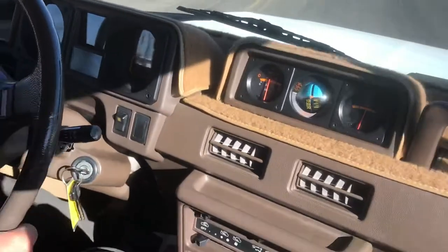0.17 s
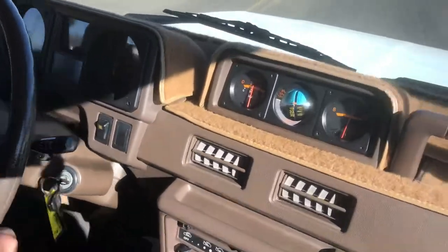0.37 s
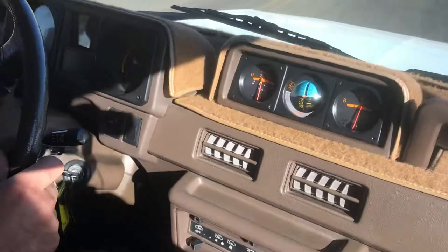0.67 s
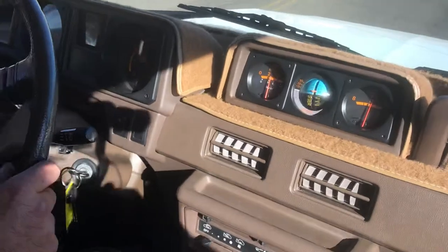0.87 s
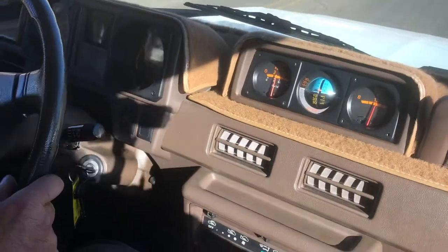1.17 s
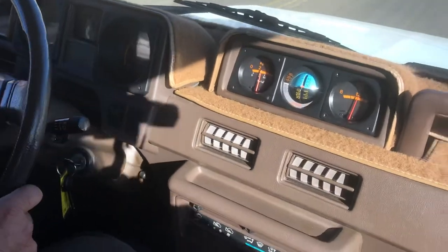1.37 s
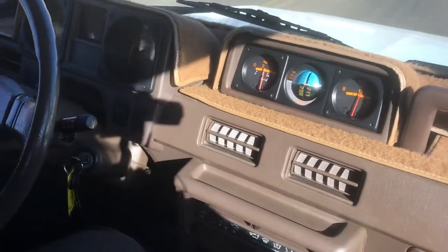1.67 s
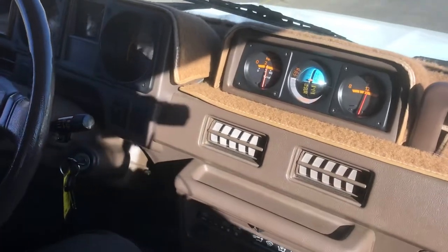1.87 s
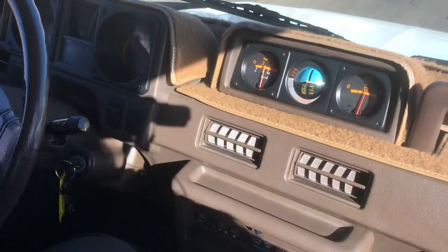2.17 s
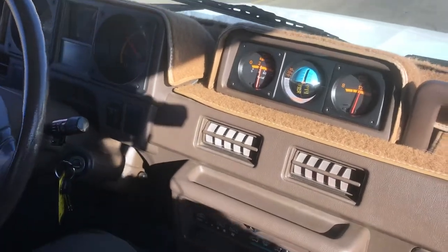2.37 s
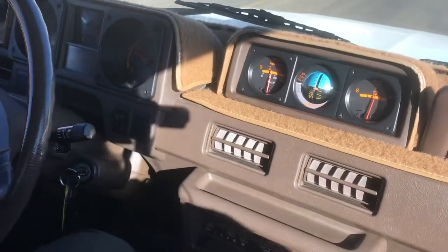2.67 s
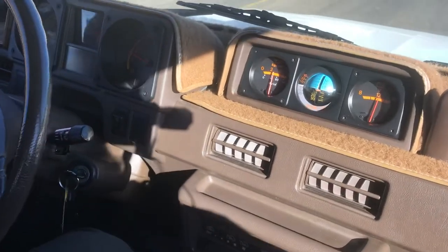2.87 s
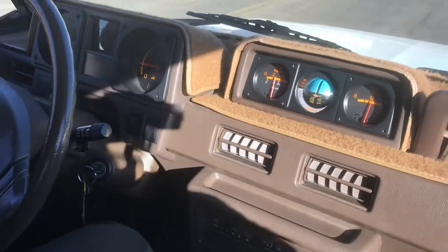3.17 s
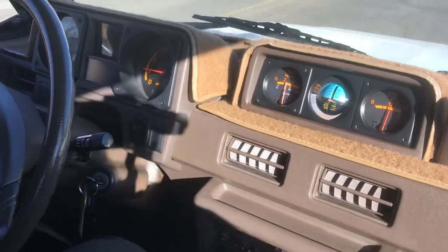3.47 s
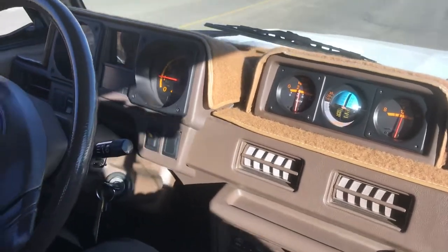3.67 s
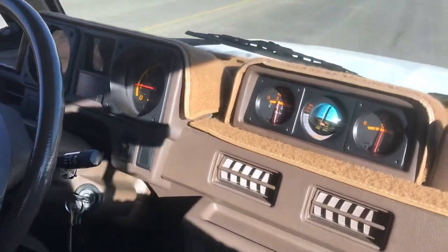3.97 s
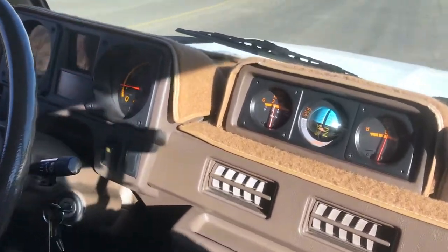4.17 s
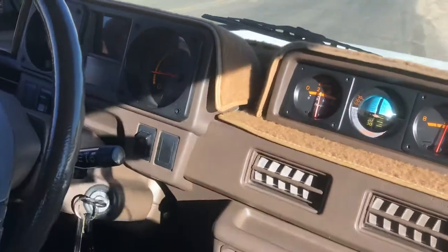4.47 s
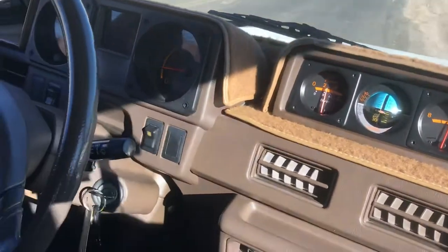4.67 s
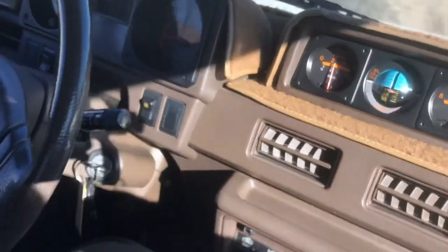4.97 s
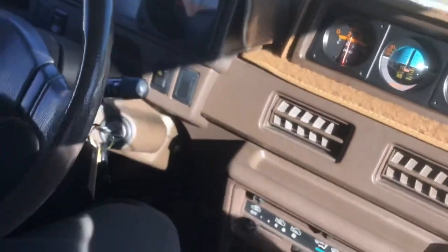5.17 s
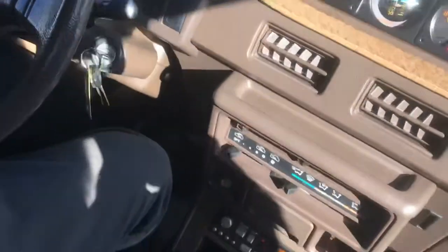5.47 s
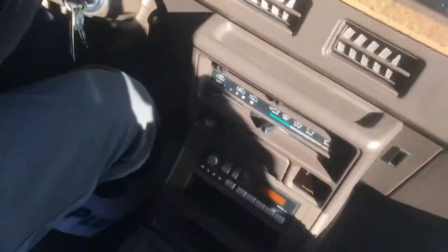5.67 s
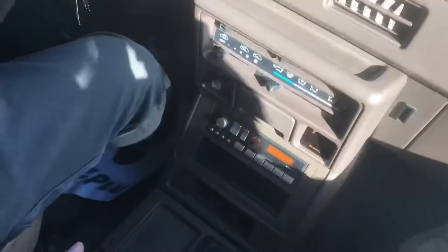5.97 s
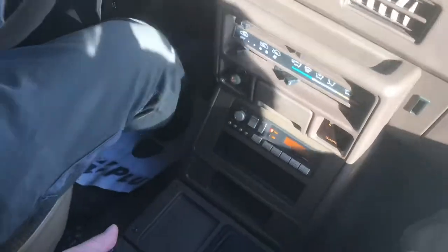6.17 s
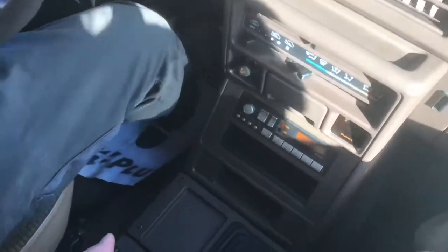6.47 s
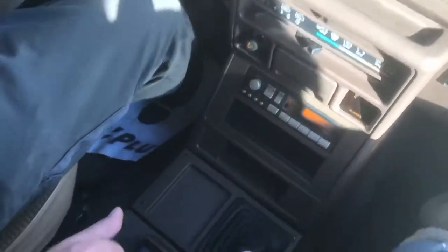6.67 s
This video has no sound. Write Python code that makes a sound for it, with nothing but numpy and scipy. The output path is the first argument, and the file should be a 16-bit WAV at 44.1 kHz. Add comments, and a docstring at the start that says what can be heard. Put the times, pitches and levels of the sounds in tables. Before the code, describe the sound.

Low cabin boom and road roar as the engine stops pulling, bumps thump and rattle the dashboard, keys tick faintly, engine hum returns quieter.

```python
"""A booming cabin and a gently pulling engine with a rising whine, inside an old four-wheel drive on a rough road.
The engine, sine tones tied to its firing rate, eases off and later returns more quietly while its whine dies away.
Shaken resonances of air, panels and tyres boom, drone and hum beneath tyre roar and air hiss made of coloured noise.
Bumps swell the road and rattle loose trim in flurries of tiny contacts; dashboard plastic clicks in sharp snaps.
Keys tick and briefly ring at the ignition, and a hand and sleeve rub softly at the wheel as grainy noise."""
import sys
import numpy as np
from scipy import signal
from scipy.fft import rfft, irfft, next_fast_len
from scipy.io import wavfile
from scipy.ndimage import uniform_filter1d, map_coordinates

SR = 44100
rng = np.random.default_rng(int(sys.argv[2]) if len(sys.argv) > 2 else 0)


def generate_wav(signal):
    """Clip the signal to [-1, 1] and save it as 16-bit WAV at the path in sys.argv[1]."""
    frames = np.transpose(np.atleast_2d(signal))
    scaled = np.clip(frames, -1, 1) * 32767
    pcm = np.round(scaled).astype(np.int16)
    wavfile.write(sys.argv[1], SR, pcm)


N = 300762

# Engine speed: (time [s], firing rate [Hz])
FIRING_RATE = [(0, 66.9), (.2, 67.3), (.4, 68.3), (.8, 69.3), (1.2, 70.1), (1.6, 71.2), (2.3, 72.3),
               (2.8, 71), (3.5, 68), (5, 66), (6.82, 64)]
# Engine load, the gain of the hum: (time [s], level [dB])
ENGINE_LOAD = [(0, -1), (.5, 2.5), (1.1, -1.5), (1.5, -1.5), (1.9, -39), (2.5, -34), (4.4, -33),
               (5.1, -9.5), (6.82, -11)]
# Engine hum at 0 dB load: (multiple of the firing rate, mean level [dB])
HUM_ORDERS = [(1, -25), (1.5, -33.5), (2, -33.5), (2.5, -49), (3, -46.5), (3.25, -49), (4.25, -58.5),
              (5.5, -62)]
# Gain of the belt whine: (time [s], level [dB])
BELT_LEVEL = [(0, -1), (.45, 1), (.75, -2), (.95, -9.5), (1.35, -1), (1.6, -2), (1.8, -17), (2.2, -6),
              (2.5, -14), (6.82, -51)]
# Whine of the belt-driven parts at 0 dB gain: (multiple of the firing rate, mean level [dB])
WHINE_ORDERS = [(14, -66), (17, -51), (18, -61), (37, -74)]


def engine():
    """Firing orders and belt whine follow the shaft speed, each with its own fluttering level and drifting phase."""
    rate_hz, = curves(FIRING_RATE)
    load_db, = curves(ENGINE_LOAD)
    belt_db, = curves(BELT_LEVEL)
    phase = 2 * np.pi * np.cumsum(rate_hz) / SR

    def tones(orders, flutter_db, drift_rad, knots_per_s):
        total = np.zeros(N)
        for multiple, db in orders:
            level = amp(db + flutter_db * wobble(knots_per_s))
            total += level * np.sin(multiple * phase + drift_rad * wobble(knots_per_s))
        return np.sqrt(2) * total  # levels are rms

    hum = tones(HUM_ORDERS, flutter_db=1.5, drift_rad=.25, knots_per_s=7)
    whine = tones(WHINE_ORDERS, flutter_db=2.8, drift_rad=.45, knots_per_s=22)
    return amp(load_db) * hum + amp(belt_db) * whine


# Bumps, timed by the trim; levels and tilt are relative, trimmed or added to the colour where they are played:
# (time [s], length [s], body thump [dB], tyre slap [dB], trim rattle [dB], rattle brightness [dB per octave])
BUMPS = [(0.84, 0.061, -27, -40, -46, 1), (0.945, 0.062, -19, -54, -63, 4),
         (1.146, 0.045, -16, -44, -62, -11), (1.567, 0.048, -22, -40, -39, -0.5),
         (1.63, 0.047, -16.5, -60, -57, 4), (1.881, 0.024, -11, -36.5, -42, -6),
         (1.966, 0.029, -16, -47, -64, -4), (2.155, 0.042, -8.5, -41.5, -59, -9),
         (2.309, 0.031, -16, -56, -58, 3), (2.606, 0.059, -15, -37, -36.5, 3),
         (2.74, 0.028, -15, -57, -47.5, 2), (2.845, 0.038, -9, -43.5, -43, 0),
         (3.124, 0.053, -14, -36.5, -39.5, 0.7), (3.373, 0.068, -11.5, -40, -46.5, 3),
         (3.569, 0.048, -19, -51, -51, 5), (3.734, 0.1, -21, -51, -65, 4),
         (3.896, 0.065, -14.5, -42.5, -48, 1), (4.187, 0.058, -12.5, -43.5, -58, -2),
         (4.535, 0.098, -15.5, -42, -45, -1.5), (4.699, 0.042, -24, -45.5, -52, 0),
         (4.798, 0.11, -17.5, -70, -74.5, -6), (5.224, .12, -21, -50.5, -45.5, -5),
         (5.811, 0.041, -29, -48, -52, -0.5), (5.97, 0.099, -24, -47.5, -41, -2),
         (6.199, 0.03, -34, -49, -38, -6.5), (6.428, 0.057, -35, -50, -47, -1),
         (6.616, 0.018, -17.5, -68, -64, -10)]
# Steady road noise between bumps, before the trims in road():
# (time [s], cabin boom [dB], panel drone [dB], tyre cavity hum [dB], tyre roar [dB], air hiss [dB])
ROAD_LEVELS = [(0.0, -18.5, -19, -38, -45.5, -65), (0.21, -21.5, -26, -42, -45.5, -62.5),
               (0.72, -22.5, -27.5, -41, -44.5, -68.5), (0.97, -22, -30, -38.5, -45.5, -64),
               (1.54, -22.5, -27, -36, -43.5, -66), (2.68, -23, -30.5, -41, -44.5, -64.5),
               (3.12, -26, -33.5, -39.5, -46, -67), (3.44, -22, -23.5, -41, -46.5, -69.5),
               (3.8, -24, -34.5, -45, -49, -60.5), (4.06, -24.5, -33.5, -41, -47, -73),
               (4.37, -28.5, -33, -46.5, -51, -71.5), (4.8, -22, -31, -43, -55, -67.5),
               (5.51, -21.5, -34.5, -47, -48.5, -66), (6.12, -26.5, -32.5, -45, -47.5, -66.5),
               (6.82, -24.5, -39, -48, -51, -67)]
# Cabin air resonances: (centre [Hz], width [Hz], relative level [dB])
CABIN_MODES = [(33.4, 20.6, -2), (47.7, 7.1, 3.5), (64.4, 10.8, -0.5)]
# Body panel resonances: (centre [Hz], width [Hz], relative level [dB])
PANEL_MODES = [(92.3, 23, -0.86), (116.6, 18.6, 2)]
# Tyre cavity resonances: (centre [Hz], width [Hz], relative level [dB])
TYRE_CAVITY_MODES = [(160.4, 33, 2.5), (213.6, 16, -4), (249.5, 34, -3.5)]
# Colour of the tyre roar: (frequency [Hz], relative level [dB per Hz])
TYRE_COLOUR = [(160, -19.5), (270, -1), (351, -5), (408, -3), (465, -8), (552, -8.5), (605, -8.5),
               (710, -9), (834, -12.5), (914, -9.5), (1190, -14.5), (1300, -15.5), (3000, -35), (3900, -39),
               (6600, -120)]
# Colour of the air hiss: (frequency [Hz], relative level [dB per Hz])
AIR_COLOUR = [(1180, -25), (2000, -5.5), (2120, -6.5), (2420, -5), (2980, -6), (4550, -8), (5000, -12.5),
              (5410, -9), (7450, -14.5), (9650, -13.5), (10400, -19.5), (11300, -14.5), (13000, -17),
              (15100, -16), (15800, -27)]


def road():
    """The wheels shake cabin air and panels; tyres hum and roar, air hisses past, and every bump swells them all."""
    boom_db, drone_db, hum_db, roar_db, hiss_db = curves(ROAD_LEVELS)
    load_db, = curves(ENGINE_LOAD)
    coasting_db = -3.5 * amp(load_db)  # the road takes over the bass as the engine eases off
    thumps = [(s, length, thump_db) for s, length, thump_db, *_ in BUMPS]
    slaps = [(s, length, slap_db) for s, length, _, slap_db, *_ in BUMPS]

    def level(steady_db, bump, bump_db):
        return np.hypot(amp(steady_db), amp(bump_db) * bump)

    air_jolt = jolts(thumps, lead_s=0.036, attack_s=0.048, release_s=0.027)
    panel_jolt = jolts(thumps, lead_s=0.019, attack_s=0.035, release_s=0.06)
    cavity_jolt = jolts(slaps, lead_s=0.0093, attack_s=0.033, release_s=0.043)
    slap = jolts(slaps, lead_s=0.014, attack_s=0.018, release_s=0.046)

    boom = level(boom_db + coasting_db + 2.4, air_jolt, bump_db=-1.84)
    drone = level(drone_db + coasting_db + 1.0, panel_jolt, bump_db=-10.0)
    hum = level(hum_db + coasting_db + 0.6, cavity_jolt, bump_db=5.5)
    roar_flutter = amp(0.29 * wobble(40) + 0.86 * wobble(9))
    roar = level(roar_db + 1.17, slap, bump_db=-0.3) * roar_flutter
    hiss_flutter = amp(1.5 * wobble(28) + 0.88 * wobble(10))
    hiss = level(hiss_db + 5.0, slap, bump_db=-18.5) * hiss_flutter

    out = boom * shaken(CABIN_MODES, low_hz=26.4, evenness=0.56)
    out += drone * shaken(PANEL_MODES, low_hz=83.5, evenness=0.59)
    out += hum * shaken(TYRE_CAVITY_MODES, low_hz=143, evenness=.5)
    return out + cabin_echoes(roar * rush(TYRE_COLOUR) + hiss * rush(AIR_COLOUR))


def shaken(modes, low_hz, evenness):
    """Resonances under random shaking, rolled off below low_hz; evenness 0-1 steadies their joint swell."""
    def body(hz):
        power = sum(amp(db) ** 2 / (1 + ((hz - centre) / width) ** 2) ** 3 for centre, width, db in modes)
        return np.sqrt(power) / np.sqrt(1 + (low_hz / (hz + 1)) ** 16)

    x = unit(filtered(rng.standard_normal(N), body))
    power = np.abs(uniform_filter1d(uniform_filter1d(x ** 2, size=3500), size=2500))
    return unit(x / (power + 1e-6) ** (np.clip(evenness, 0, 1) / 2))


def jolts(rows, lead_s, attack_s, release_s):
    """Joint strength of (s, length, dB) jolts; a part starts to move lead_s before the trim does."""
    power = np.zeros(N)
    for s, length, db in rows:
        power += (amp(db) * stroke(s - lead_s, length + lead_s, attack_s, release_s)) ** 2
    return np.sqrt(power)


def cabin_echoes(x, wall_db=-14.0, count=16):
    """Weak echoes off the glass and dashboard ripple the colour of the road noise."""
    delays_s = rng.uniform(.002, .03, count)
    signs = rng.choice([-1, 1], count)
    out = x.copy()
    for delay_s, sign in zip(delays_s, signs):
        add(out, delay_s, sign * amp(wall_db) / np.sqrt(count) * x)
    return out


# Colour of the loose trim before each bump's brightness tilt: (frequency [Hz], relative level [dB])
TRIM_COLOUR = [(150, -33), (300, -4.5), (600, -2), (950, 9.5), (1300, 3.5), (1700, 2.5), (2300, -5.5),
               (4200, -8), (5000, -13), (7000, -16.5), (8000, -21.5), (9500, -22.5), (10500, -29),
               (12000, -21), (15800, -32.5)]


def rattles(contacts_per_s=700, scatter_db=4, rise=0.16, level_db=-2.5, wash=0.75):
    """Each bump throws loose trim into a swelling and dying flurry of tiny contacts over a wash of noise."""
    out = np.zeros(N)
    for s, length, _, _, db, bright_db in BUMPS:
        u = np.arange(int(2 * length * SR)) / (length * SR)  # time in bump lengths
        swell = np.minimum(u / rise, 1) / (1 + u ** 8)
        struck = rng.random(len(u)) < contacts_per_s / SR
        hits = struck * amp(scatter_db * rng.standard_normal(len(u)))
        grain = unit(hits * rng.choice([-1, 1], len(u))) + wash * rng.standard_normal(len(u))
        flurry = signal.fftconvolve(swell * unit(grain), impulse(TRIM_COLOUR, bright_db))
        add(out, s, amp(db + level_db) * flurry)
    return out


# Single knocks and clicks of the dashboard plastic:
# (time [s], rms level over the first 8 ms [dB], main resonance [Hz], brightness tilt [dB per octave])
PLASTIC_CLICKS = [(0.853, -45, 1300, -2), (1.564, -36.5, 1150, -3.5), (1.593, -41.5, 1310, -1.5),
                  (1.622, -41, 1590, -5), (1.8994, -39.5, 1620, -1.5), (2.170, -42, 1100, -3.5),
                  (2.401, -50, 2560, -2.5), (2.5085, -46, 1500, -5.5), (2.5496, -44.5, 2150, -2.5),
                  (2.606, -35, 910, -8.5), (2.621, -38.5, 1810, -9), (2.677, -40.5, 3820, -0.5),
                  (3.143, -41.5, 1810, 1.5), (3.5944, -38, 2150, -3.5), (3.6492, -36.5, 2680, -2),
                  (3.771, -46.5, 2800, 6), (4.0368, -40.5, 1630, 2), (4.247, -42.5, 2450, -1),
                  (5.052, -48, 2210, -4), (5.5904, -48.5, 2600, -8), (5.648, -47, 2200, -10),
                  (5.8173, -49.5, 2440, -5.5), (5.981, -38, 1120, -15.5), (6.211, -46, 1000, -10),
                  (6.297, -49, 2500, -9.5), (6.351, -43.5, 2500, -9.5), (6.416, -49, 2500, -6),
                  (6.433, -42.5, 2350, -2), (6.51, -46.5, 1950, -12.5)]
# Colour of the plastic before the tilt: (frequency [Hz], relative level [dB])
PLASTIC_COLOUR = [(300, -14.5), (1000, -4), (1600, 3), (2100, -1), (2500, 0.5), (3300, -1), (4200, -4),
                  (4900, -5.5), (6200, -8.5), (9000, -15), (15800, -30)]


def clicks(q=5, resonance_db=3):
    """Dashboard plastic snaps against its seat as the body twists; each piece has its own resonance."""
    out = np.zeros(N)
    for s, db, hz, bright_db in PLASTIC_CLICKS:
        snap = impulse(PLASTIC_COLOUR, bright_db)
        resonance = signal.lfilter(*signal.iirpeak(hz, q, SR), snap)
        piece = snap + amp(resonance_db) * resonance
        click = contact(piece, t60=0.031, ring_db=8.5, cabin_db=-10, cabin_t60=0.085)
        add(out, s, amp(db) * click)
    return out


# Runs of the keys tapping together: (time [s], run length [s], level before random scatter [dB])
KEY_RUNS = [(0.039, .01, -53), (.3044, .01, -57), (0.417, .01, -56), (1.863, .07, -59), (2.102, .16, -58.5),
            (2.901, .07, -55.5), (3.058, .04, -56.5), (3.206, .01, -54), (3.452, .04, -58),
            (4.6014, .04, -59), (4.728, .1, -59), (5.183, .01, -57), (5.3911, .07, -59.5),
            (6.0744, .01, -49), (6.4, .01, -57)]
# Keys ringing freely: (time [s], pitch [Hz], starting peak level [dB])
KEY_PINGS = [(3.143, 13450, -52), (3.28, 13600, -52), (3.28, 9450, -54), (5.17, 9800, -54),
             (5.392, 11400, -47), (5.595, 13450, -58), (6.137, 13450, -54)]
# Colour of the key taps: (frequency [Hz], relative level [dB])
KEY_COLOUR = [(3000, -33), (6400, -6), (7100, 4.5), (7900, -12), (9500, -1), (10500, -19), (11500, -5),
              (13500, -6.5), (15800, -3)]


def keys(count=18, faint_db=-63, scatter_db=1):
    """The hanging keys tap in short even runs, with fainter touches scattered about; now and then one rings briefly."""
    out = np.zeros(N)
    swing_s, ring_t60 = .029, .04  # time between taps of a run, 60 dB decay of a ping [s]
    faint = [(u * N / SR, faint_db + 2 * v) for u, v in rng.random((count, 2))]
    taps = [(s + delay, db) for s, length, db in KEY_RUNS for delay in np.arange(0, length, swing_s)]
    colour = impulse(KEY_COLOUR)
    for s, db in faint + taps:
        tap = contact(colour, t60=.028, ring_db=5, cabin_db=-24, cabin_t60=.05)
        add(out, s, amp(db + scatter_db * rng.standard_normal()) * tap)
    t = np.arange(SR // 5) / SR
    for s, hz, db in KEY_PINGS:
        add(out, s, amp(db - 60 * t / ring_t60) * np.sin(2 * np.pi * hz * t))
    return out


# Soft rubbing of a hand and sleeve at the wheel: (time [s], length [s], level before the grain [dB])
RUBS = [(1.3, 0.4, -60), (3.553, .71, -58.5)]
# Colour of cloth and skin: (frequency [Hz], relative level [dB])
CLOTH_COLOUR = [(1000, -5), (2400, -3.5), (3500, -2), (4500, 2), (5000, -0.5), (5700, -2.5), (7500, -8.5),
                (11000, -13.5), (15800, -9)]


def rubbing():
    """Cloth and skin slide with a fine uneven grain."""
    slide = sum(amp(db) * stroke(s, length, attack_s=.04, release_s=0.038) for s, length, db in RUBS)
    grain = amp(1.9 * wobble(150))
    return slide * grain * rush(CLOTH_COLOUR)


def contact(colour, t60, ring_db, cabin_db, cabin_t60):
    """One contact, rms 1 over its first 8 ms: a sharp snap, a dense short ring and the padded cabin's answer."""
    t = np.arange(SR // 10) / SR
    decay = amp(-60 * t / t60) + amp(cabin_db - 60 * t / cabin_t60)
    ring = decay * rng.standard_normal(len(t))
    snap = t == 0
    x = signal.fftconvolve(snap + amp(ring_db) * ring / np.linalg.norm(ring), colour)
    return x / np.sqrt(np.mean(x[:round(.008 * SR)] ** 2))


def impulse(spectrum, tilt_db=0):
    """Causal response of energy 1 to one sharp contact, tilted in dB per octave about 1 kHz (flat below 500 Hz)."""
    size = 2048
    hz = np.fft.rfftfreq(size, 1 / SR)
    tilt = tilt_db * np.log2(np.maximum(hz, 500) / 1000)
    # folding the cepstrum gives minimum phase, so the energy comes at once
    cepstrum = irfft(np.log(amp(along(spectrum, hz) + tilt)))
    cepstrum[1:size // 2] *= 2
    cepstrum[size // 2 + 1:] = 0
    h = irfft(np.exp(rfft(cepstrum)))
    return h / np.linalg.norm(h)


def stroke(s, length, attack_s, release_s):
    """Envelope that rises, holds until s + length and dies away."""
    t = np.arange(N) / SR - s
    return np.clip(t / attack_s, 0, 1) * np.exp(-np.maximum(t - length, 0) / release_s)


def rush(spectrum):
    """Noise of rms 1 with the given colour."""
    return unit(filtered(rng.standard_normal(N), lambda hz: amp(along(spectrum, hz))))


def filtered(x, response):
    """x times a response of frequency."""
    m = next_fast_len(N + SR // 2)  # padded so that tails do not wrap
    return irfft(rfft(x, m) * response(np.fft.rfftfreq(m, 1 / SR)), m)[:N]


def wobble(rate):
    """A smooth random curve, rate knots a second."""
    knots = rng.standard_normal(int(N * rate / SR) + 4)
    return map_coordinates(knots, [np.arange(N) * rate / SR])


def curves(rows):
    """One value per sample for each column after the time."""
    s, *columns = np.transpose(rows)
    return [np.interp(np.arange(N) / SR, s, column) for column in columns]


def along(points, hz):
    """Interpolate (Hz, value) points on a log frequency axis."""
    f, v = np.transpose(points)
    return np.interp(np.log(hz + 1), np.log(f + 1), v)


def add(track, s, x):
    """Mix x into the track at time s."""
    i = max(round(s * SR), 0)
    track[i:i + len(x)] += x[:max(N - i, 0)]


def amp(db):
    """Decibels to gain."""
    return 10 ** (np.asarray(db) / 20)


def unit(x):
    """Scale to rms 1."""
    return x / np.sqrt(np.mean(x ** 2) + 1e-20)


def scene():
    """Everything as heard from the front seat."""
    return (engine() + road() + rattles() + clicks() + keys() + rubbing())[None]


def record(dry):
    """Roll off the deepest rumble and keep nothing from the top band limit upwards."""
    low_hz, top_hz = 24, 15850

    def band(hz):
        return (hz < top_hz) / np.sqrt(1 + (low_hz / (hz + 1)) ** 16)

    return filtered(dry[0], band)[None]


dry = scene()
out = record(dry)
generate_wav(out)
```